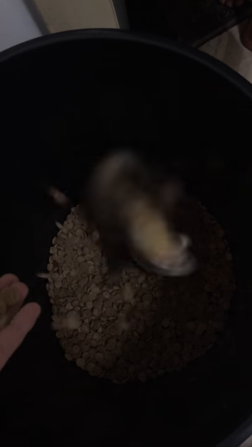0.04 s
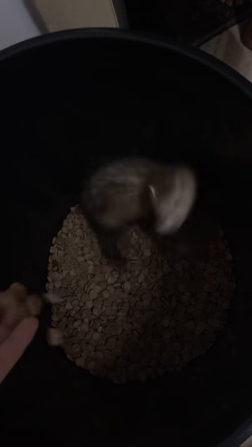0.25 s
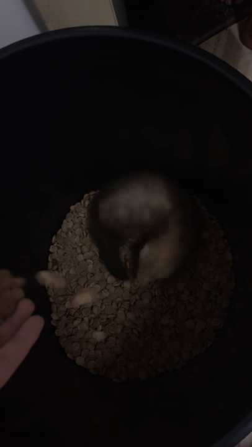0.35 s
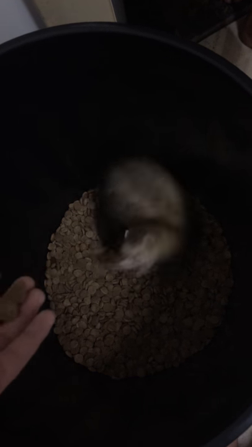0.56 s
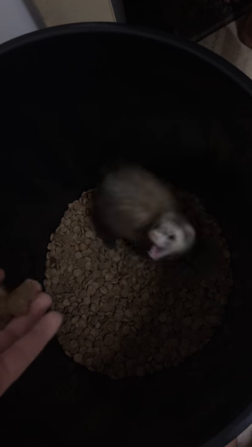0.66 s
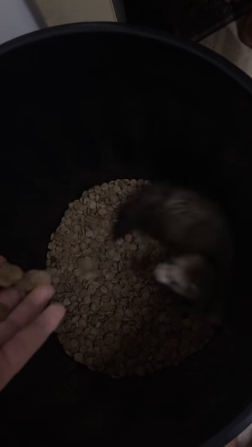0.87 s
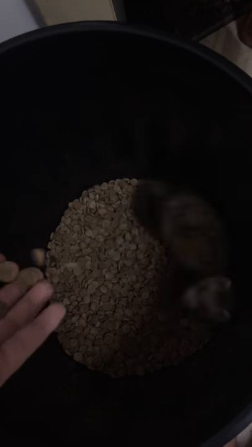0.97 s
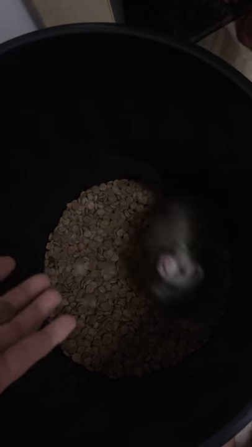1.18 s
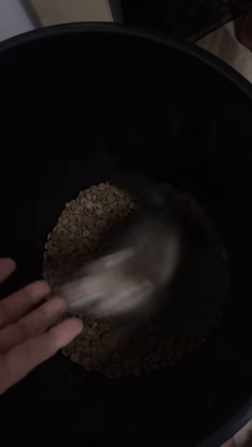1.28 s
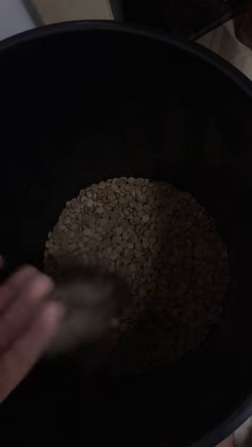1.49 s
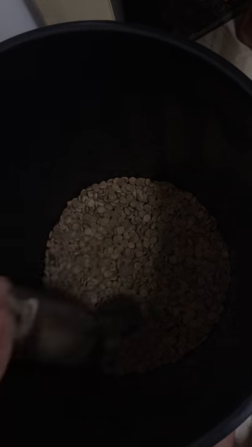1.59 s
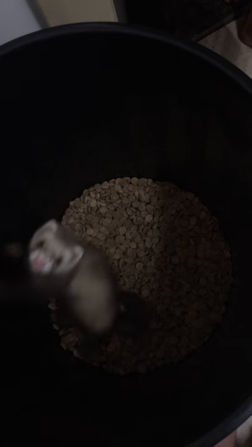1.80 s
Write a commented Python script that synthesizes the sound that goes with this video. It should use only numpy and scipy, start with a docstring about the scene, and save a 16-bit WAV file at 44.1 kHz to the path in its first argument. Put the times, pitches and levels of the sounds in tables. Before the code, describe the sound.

Hard biscuits clatter irregularly around the bottom of a plastic barrel, shoved and flung by a ferret's paws. One loud hollow thump comes early and softer ones follow, each with a short echo, heard close at the rim indoors.

```python
"""Dry biscuits knock around the bottom of a plastic barrel as a ferret scrambles over them.
Each flung biscuit rattles on the wall and rings briefly; others tick against each other.
Paws shove the heap and thump the barrel, whose hollow air booms low and gives each of these
sounds a short echo. It is all heard from the rim, in a quiet room."""
import sys
import numpy as np
from scipy import signal
from scipy.fft import rfft, irfft
from scipy.io import wavfile

SR = 44100
rng = np.random.default_rng(int(sys.argv[2]) if len(sys.argv) > 2 else 0)


def materialize(psi):
    """Save the field psi as 16-bit PCM at rate SR to the path in sys.argv[1].

    A 1-D psi becomes a single channel; in a 2-D psi each row is a channel.
    """
    bounded = np.clip(np.atleast_2d(psi).T, -1, 1)
    quanta = np.round(bounded * 32767).astype(np.int16)
    wavfile.write(sys.argv[1], SR, quanta)


N = 81585

# Tone of the room noise: frequency_hz, level_db
ROOM_TONE = [(25, -2), (50, 5.5), (110, 11.5), (200, -2), (300, -1), (800, -2), (2000, -9), (5000, -22.5),
             (15000, -24)]
# Tone of the barrel's echo: frequency_hz, level_db
ECHO_TONE = [(80, -13), (175, 2), (280, 3), (460, 2), (900, 0), (2000, 2.5), (4000, 0.5), (8000, 1),
             (16000, -1)]
# Tone of the shifting heap: frequency_hz, level_db
HEAP_TONE = [(100, -18), (300, -3), (460, 2), (850, 3.5), (1400, 0), (2500, -5), (4000, -8), (8000, -11.5),
             (16000, -9.5)]
# Tone of the crack when the wall is hit: frequency_hz, level_db
CRACK_TONE = [(100, -36), (300, -4), (600, -3), (2000, -11), (5000, -8), (9000, -10.5), (16000, -21)]
# Pitches at which the wall rings: pitch_hz, width_hz, level_db
WALL_RINGS = [(469, 73, -8), (546.5, 37, -2.5), (637, 156, -3), (770, 89, -4.5), (1000, 132, -1.5),
              (1114, 630, -6), (1520, 180, -7), (1833, 70, -1.5), (2310, 690, -3), (2560, 92, -2),
              (3090, 390, -5.5), (4160, 1460, -7)]
# Paws shoving the heap: start_s, length_s, level_db, upper_edge_hz
PAW_SHOVES = [(0, 0.03, -36, 7700), (0.139, 0.11, -46.5, 13000), (0.267, 0.068, -27, 3470),
              (0.337, 0.16, -34.5, 5100), (0.528, 0.034, -39, 3830), (0.647, 0.095, -34, 4930),
              (0.762, 0.069, -30.5, 5800), (0.878, 0.08, -42.5, 4930), (0.965, 0.093, -37, 3220),
              (1.156, 0.11, -37, 9400), (1.224, 0.16, -34, 4000), (1.531, 0.093, -39, 3870),
              (1.616, 0.094, -41, 9600), (1.656, 0.064, -27, 3360), (1.659, 0.23, -49.5, 14000),
              (1.75, 0.098, -44, 9200)]
# Body and paws landing: start_s, level_db, pitch_hz, push_s, boom_share (0 to 1)
LANDINGS = [(0.2659, -10, 175.5, 0.021, 0.95), (0.324, -33.5, 122.6, 0.11, 0.27),
            (0.408, -40, 177, 0.026, 0.7), (.659, -52, 173, 0.076, 0.95), (0.754, -32, 156, 0.018, 0.8),
            (.94, -39, 173.5, 0.074, 0.82), (1.245, -33.5, 169, 0.047, 1), (1.428, -34, 162, .005, 0.7),
            (1.657, -29, 121, 0.021, 0.46)]
# Biscuit hitting biscuit: start_s, level_db, pitch_hz, contact_s
BISCUIT_TICKS = [(.006, -27.5, 6200, 0.0023), (.05, -39, 6040, 0.00046), (.132, -36.5, 8100, 0.0021),
                 (0.1446, -21.5, 13300, 0.0012), (.1931, -22, 9000, 0.00076), (.2338, -30, 8900, 0.00055),
                 (0.3073, -30, 7900, 0.0016), (.315, -36, 7900, .0008), (0.3292, -30, 8700, 0.00072),
                 (0.3362, -19.5, 4700, 0.00092), (0.379, -33, 7160, 0.0021), (.5486, -33, 10600, 0.00066),
                 (0.5855, -29.5, 7700, .0018), (0.645, -32, 7660, 0.0033), (.654, -35, 9700, 0.0015),
                 (.657, -30.5, 7750, 0.0012), (0.7384, -37, 8000, 0.00074), (0.7488, -26.5, 8600, .0014),
                 (0.7627, -27, 6900, 0.00077), (0.766, -22.5, 6100, 0.0006), (.902, -45, 7000, 0.0035),
                 (.967, -31, 7300, 0.00027), (0.9687, -38.5, 7550, 0.0012), (1.143, -36, 5900, 0.00078),
                 (1.1465, -33, 5340, 0.0011), (1.1574, -20.5, 11600, 0.0022), (1.1916, -39, 6400, 0.0009),
                 (1.224, -35.5, 7540, 0.0016), (1.266, -28, 10100, 0.0016), (1.2866, -26, 5600, 0.00079),
                 (1.2903, -35, 7000, .0015), (1.303, -33, 6600, 0.0018), (1.349, -44, 8750, 0.0014),
                 (1.385, -48, 6000, 0.00089), (1.4281, -34, 4300, 0.0017), (1.4463, -51, 10000, 0.0011),
                 (1.4584, -43, 9100, 0.0018), (1.513, -32.5, 5330, 0.003)]
# Biscuits hitting the wall: start_s, level_db, low_ring_boost_db, main_ring_hz, main_ring_boost_db,
# upper_ring_hz, upper_ring_boost_db, biscuit_ring_boost_db, contact_s
WALL_KNOCKS = [(.003, -20, -25, 1220, 4, 3650, -1.5, 13.5, 0.0037),
               (0.204, -6, 4.5, 1000, 1.5, 2080, 1, 5, .0034),
               (0.2623, -12, 11, 446, 11, 930, 9.5, -5, 0.0019),
               (0.283, -21, -9, 594, -17, 2530, 0, 9, 0.00067),
               (.337, -17.5, -5, 770, 2, 4100, 7, 1.5, .0021),
               (.523, -35.5, -7, 840, 17, 2450, -7, -11, 0.0032),
               (.601, -27, -11, 825, 3, 3400, 0, -3, 0.0049),
               (0.623, -29.5, -1, 966, 2, 3700, 3, 1, 0.0071), (.651, -23, -6, 940, 18, 3820, 11, 0, 0.004),
               (.658, -22.5, -2, 1140, 2, 4300, 4.5, -2, 0.0017), (.684, -26, 1, 840, 5, 1960, 4, 0, .011),
               (0.7459, -8, 6.5, 1250, 6.5, 3070, 3.5, 0.5, 0.0036),
               (.784, -21.5, 2.5, 667, 2, 2590, -14, 6, 0.0041), (.827, -28, -5, 780, 8, 2950, 2, 0, .0038),
               (.967, -34, -1, 770, 9, 2600, -3, -3, 0.0043),
               (1.2015, -19.5, -4, 824, 14, 1350, 12, -14, 0.0041),
               (1.214, -18, -0.5, 950, 7, 2130, 2, 5.5, 0.0072),
               (1.313, -36, 1, 1000, -5, 2280, -2, 11, 0.0036),
               (1.342, -28.5, -1.5, 790, 6, 1330, -1, 0, 0.0093),
               (1.4842, -9, 8.5, 1119, 13.5, 3470, 2, 10.5, 0.0034),
               (1.5322, -15, 3, 785, 3.5, 1680, 8.5, 14.5, 0.0034),
               (1.6552, -21.5, -30, 810, 5, 4100, 6, -15, 0.004),
               (1.7829, -36, 6, 790, -2, 2680, 17, -5, 0.003),
               (1.803, -32.5, -12, 860, 6, 2970, 4.5, 1, 0.0036)]

T = np.arange(N) / SR
HIT_T = T[:8192]  # time within one hit, in seconds
HZ = np.maximum(np.fft.rfftfreq(8192, 1 / SR), 1)  # the frequencies every filter is drawn on


def undb(db):
    """Turn decibels into a gain: a number to multiply the sound by."""
    return 10 ** (np.asarray(db) / 20)


def level(x, db):
    """Set a sound's average (rms) level."""
    return x * undb(db) / np.sqrt(np.mean(x ** 2))


def strength(x, db):
    """Give a hit the energy of 4 ms of sound at this level."""
    return x * undb(db) * np.sqrt(.004 * SR / np.sum(x ** 2))


def curve(points):
    """Join (Hz, dB) points into a gain for every frequency."""
    hz, db = np.array(points).T
    return undb(np.interp(np.log(HZ), np.log(hz), db))


def edges(low_hz, high_hz):
    """Gains that keep a band and fade by 12 dB per octave outside it."""
    return 1 / np.sqrt((1 + (low_hz / HZ) ** 4) * (1 + (HZ / high_hz) ** 4))


def bump(hz, db, octaves):
    """Gains that raise or lower the area around one pitch."""
    return undb(db * np.exp(-.5 * (np.log2(HZ / hz) / octaves) ** 2))


def resonance(hz, width_hz):
    """Gains that keep one narrow, ringing band."""
    return 1 / np.sqrt(1 + ((HZ - hz ** 2 / HZ) / width_hz) ** 4)


def colour(x, gain):
    """Filter a sound by these gains, so that any ringing comes after a hit, never before."""
    cepstrum = irfft(np.log(gain + 1e-5))
    cepstrum[1:len(cepstrum) // 2] *= 2
    cepstrum[len(cepstrum) // 2 + 1:] = 0
    response = irfft(np.exp(rfft(cepstrum)))
    return signal.fftconvolve(x, response)[:len(x)]


def envelope(t, rise_s, hold_s, fall_s):
    """A loudness shape that rises, stays up until hold_s, then dies away."""
    return np.minimum(t / rise_s, 1) * np.exp(-np.maximum(t - hold_s, 0) / fall_s)


def chatter(shape):
    """The brief, random rattle of two things touching."""
    x = rng.standard_normal(len(shape)) * shape
    for _ in range(2):  # even out the tone, then restore the fade
        spectrum = rfft(x)
        x = irfft(spectrum / np.sqrt(np.abs(spectrum) + 1e-9)) * np.sqrt(shape)
    return x


def add(out, start_s, x):
    """Mix a sound in at its start time."""
    i = max(int(start_s * SR), 0)
    out[i:i + len(x)] += x[:max(N - i, 0)]


def room():
    """Quiet room noise, with the air in the barrel humming along."""
    hum = colour(rng.standard_normal(N), resonance(hz=170, width_hz=37))
    noise = colour(rng.standard_normal(N), curve(ROOM_TONE))
    return level(noise, db=-46.5) + level(hum, db=-46)


def barrel_echo(x):
    """Sound bounces between the walls and blurs into a short tail; the highs die a little sooner."""
    t, tail = T[:N // 3], 0
    build_up = np.minimum(t / .0011, 1)
    for side, fade_s in (("low", .21), ("high", .19)):  # time to fade by 60 dB
        split = signal.butter(2, 3000, side, fs=SR, output="sos")
        band = signal.sosfilt(split, rng.standard_normal(len(t)))
        tail = tail + band * undb(-60 * t / fade_s) * build_up
    tail = colour(tail / np.sqrt(np.sum(tail ** 2)), curve(ECHO_TONE))
    return signal.fftconvolve(x, tail)[:N]


def wall_rub():
    """Under the last hard shove, the wall briefly sings one low note."""
    start_s = 1.66
    note = colour(rng.standard_normal(N), resonance(hz=452, width_hz=15.5))
    swell = envelope(np.maximum(T - start_s, 0), rise_s=.02, hold_s=.07, fall_s=.028)
    return level(note, db=-40.5) * swell


def paw_shoves():
    """Each shove sets off a shower of tiny collisions in the heap."""
    out, t = np.zeros(N), T[:N // 4]
    hits_per_s, spread_db, hit_fall_s = 1500, 2.5, .0014
    for start_s, length_s, db, high_hz in PAW_SHOVES:
        hits = rng.random(len(t)) < hits_per_s / SR
        sizes = undb(spread_db * np.minimum(rng.exponential(size=len(t)), 4))
        # Each collision becomes a tiny, fading burst of noise.
        power = signal.lfilter([1], [1, -np.exp(-1 / (hit_fall_s * SR))], (hits * sizes) ** 2)
        bursts = np.sqrt(power) * rng.standard_normal(len(t))
        crunch = colour(bursts, curve(HEAP_TONE) * edges(low_hz=88, high_hz=high_hz))
        shove = envelope(t, rise_s=.00057, hold_s=length_s / 2, fall_s=.011 + length_s / 4)
        add(out, start_s, level(crunch, db) * shove)
    return out


def body_thumps():
    """The ferret's weight drums the barrel: a dull thud, then a sagging boom and a loose rumble."""
    out, t = np.zeros(N), HIT_T
    for start_s, db, hz, push_s, boom_share in LANDINGS:
        sagging_hz = hz * (1 + .12 * (np.exp(-t / push_s) - .5))  # from 6% above hz toward 6% below
        boom = np.sqrt(2) * np.sin(2 * np.pi * np.cumsum(sagging_hz) / SR)
        rumble = colour(rng.standard_normal(len(t)), edges(low_hz=65, high_hz=185) ** 2)
        thump = np.sqrt(boom_share) * boom + np.sqrt(1 - boom_share) * level(rumble, db=0)
        thump *= envelope(t, rise_s=.005, hold_s=push_s, fall_s=.0085)
        thud = colour(chatter(np.exp(-t / .0074)), edges(low_hz=245, high_hz=468) ** 2)
        add(out, start_s, undb(db) * (thump + strength(thud, db=-9.5)))
    return out


def biscuit_ticks():
    """Hard, dry biscuits meet: a tiny bright snap, a faint ring and a sprinkle of crumbs."""
    out, t = np.zeros(N), HIT_T
    ring_fall_s, crumb_fall_s, crumbs_per_s, peak_octaves = .003, .004, 500, .54
    brightness = undb(-9) * edges(low_hz=2500, high_hz=15000) ** 3
    for start_s, db, hz, contact_s in BISCUIT_TICKS:
        snap = chatter(envelope(t + 1 / SR, rise_s=.0001, hold_s=contact_s, fall_s=.0006))
        ring = rng.standard_normal(len(t)) * np.exp(-t / ring_fall_s)
        crumb_hits = rng.random(len(t)) < crumbs_per_s / SR
        crumbs = crumb_hits * rng.standard_normal(len(t)) * np.exp(-t / crumb_fall_s)
        tick = strength(snap, db=0) + strength(ring, db=-9) + strength(crumbs, db=-7)
        peak = np.exp(-.5 * (np.log2(HZ / hz) / peak_octaves) ** 2)
        add(out, start_s, strength(colour(tick, peak + brightness), db))
    return out


def wall_knocks():
    """A biscuit rattles on the plastic and rings with the wall; each spot favours its own pitches."""
    out = np.zeros(N)
    wall_hz, width_hz, wall_db = np.array(WALL_RINGS).T[:, :, None]
    for start_s, db, low_db, main_hz, main_db, upper_hz, upper_db, biscuit_db, contact_s in WALL_KNOCKS:
        detuned_hz = wall_hz * (1 + .008 * rng.standard_normal(wall_hz.shape))
        rings = undb(wall_db) * resonance(detuned_hz, width_hz)
        wall = np.sqrt(np.sum(rings ** 2, axis=0) + curve(CRACK_TONE) ** 2)
        spot = bump(hz=595, db=low_db, octaves=.21)
        spot *= bump(main_hz, main_db, octaves=.17)
        spot *= bump(upper_hz, upper_db, octaves=.15)
        band = edges(low_hz=380, high_hz=upper_hz) * edges(low_hz=380, high_hz=16300)
        biscuit = bump(hz=3680, db=biscuit_db, octaves=.075)
        force = chatter(envelope(HIT_T + 1 / SR, rise_s=.0001, hold_s=contact_s, fall_s=.0016))
        knock = colour(force, wall * spot * band * biscuit)
        add(out, start_s, strength(knock, db))
    return out


def scene():
    """Mix the sounds in the barrel with their echo and the room, in one channel."""
    sources = np.array([wall_knocks(), biscuit_ticks(), body_thumps(), paw_shoves() + wall_rub()])
    into_echo = undb([-9, -13.5, -12, -13.5]) @ sources  # each source's share, in the order above
    return (sources.sum(axis=0) + barrel_echo(into_echo) + room())[None]


def record(dry):
    """The microphone softens the very highest sounds, rounds loud peaks and cuts off above 16.3 kHz."""
    soft = signal.sosfilt(signal.butter(4, 15600, fs=SR, output="sos"), dry)
    rounded = 1.2 * np.tanh(soft / 1.2)
    return signal.sosfilt(signal.ellip(8, .2, 70, 16300, fs=SR, output="sos"), rounded)


dry = scene()
out = record(dry)
materialize(out)
```